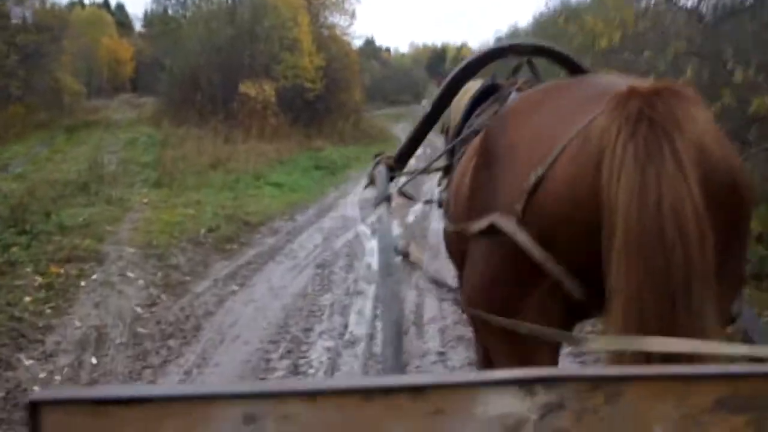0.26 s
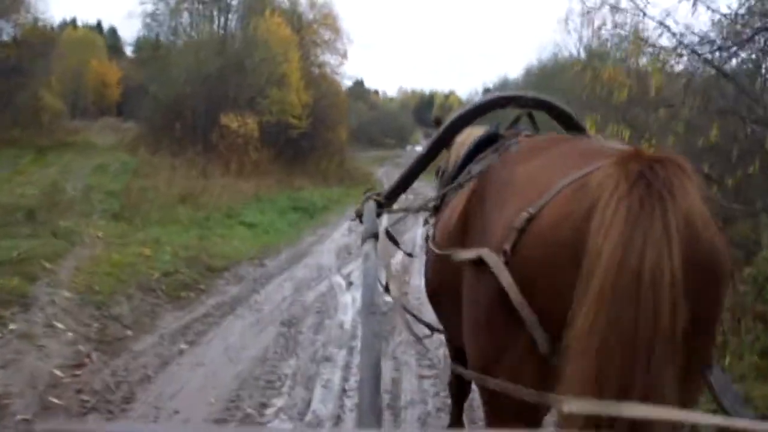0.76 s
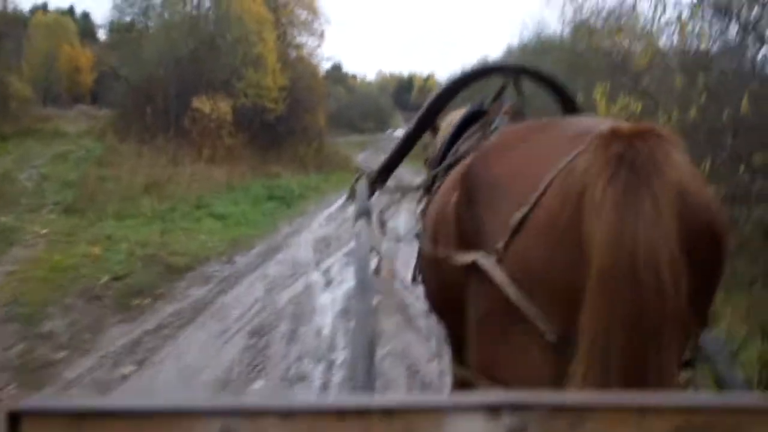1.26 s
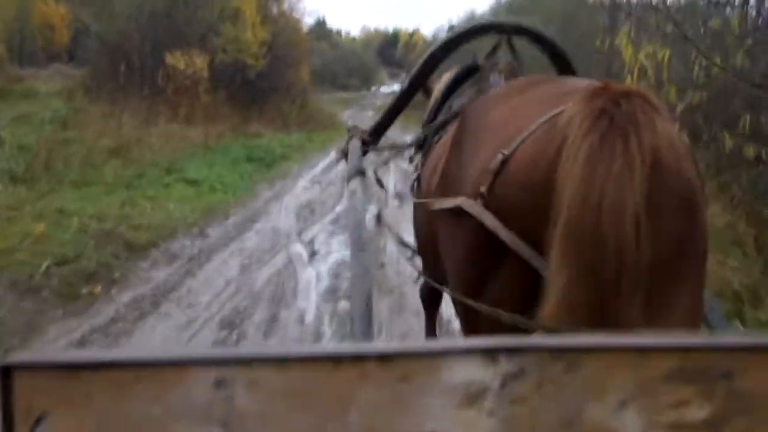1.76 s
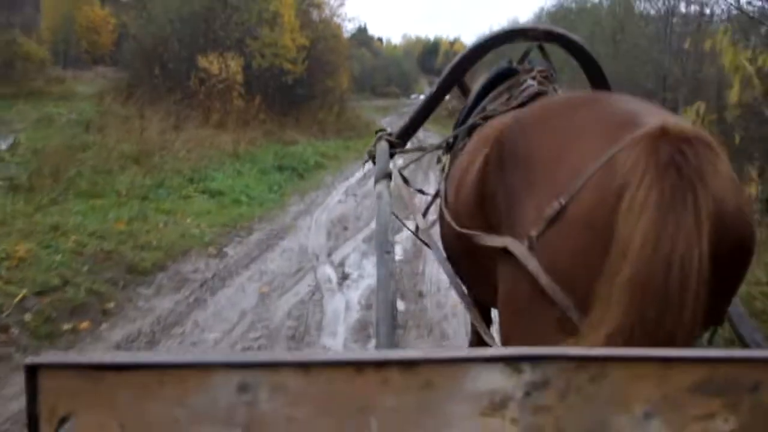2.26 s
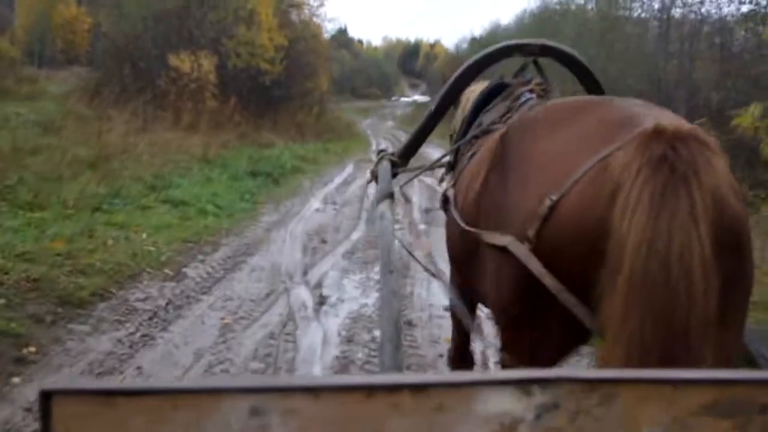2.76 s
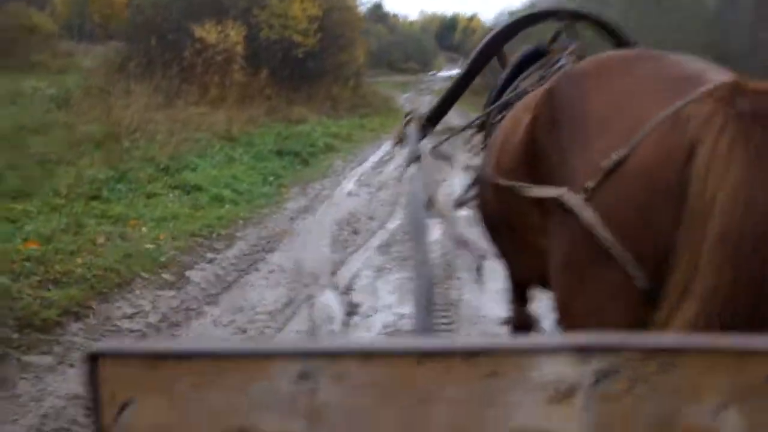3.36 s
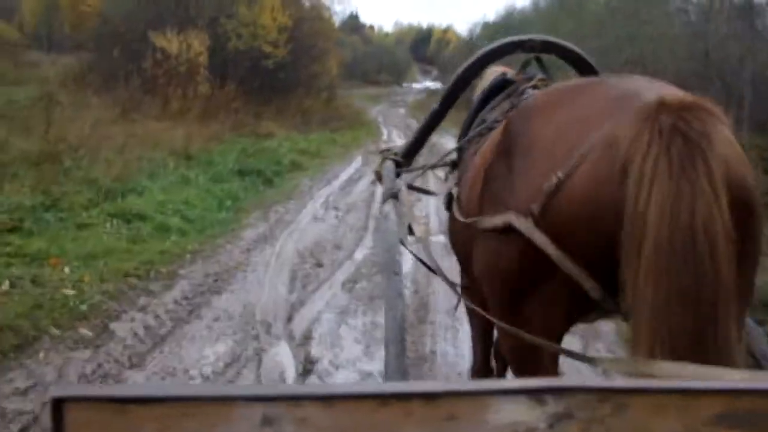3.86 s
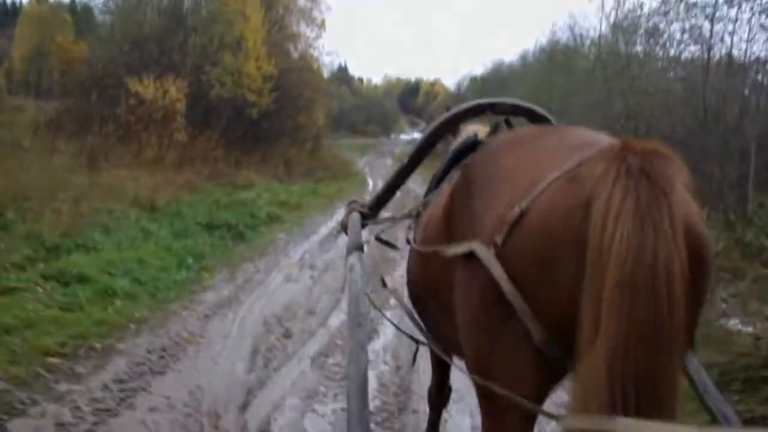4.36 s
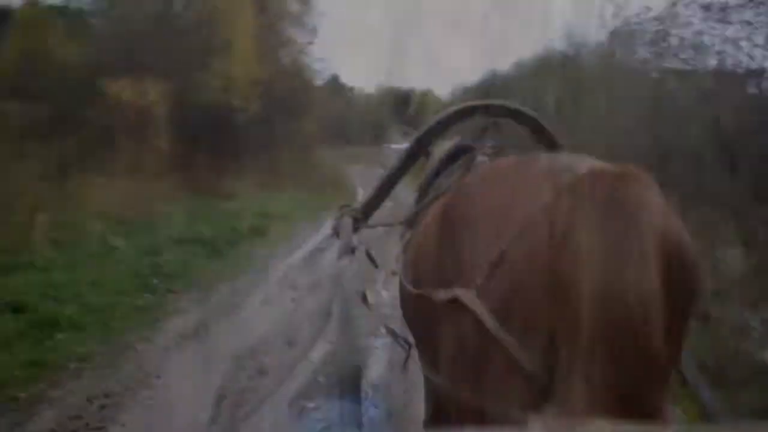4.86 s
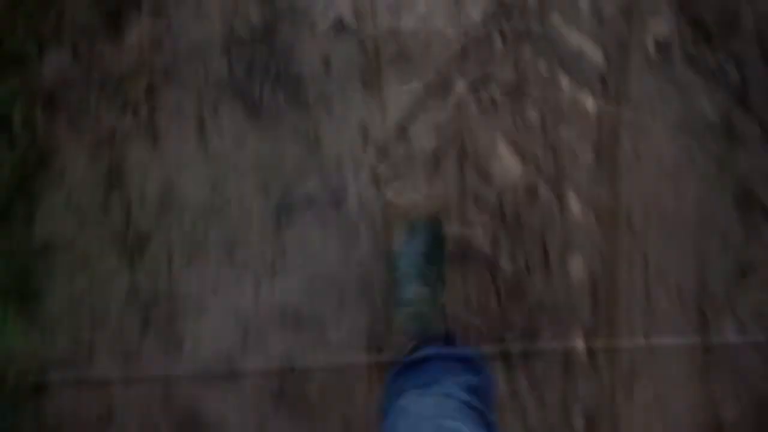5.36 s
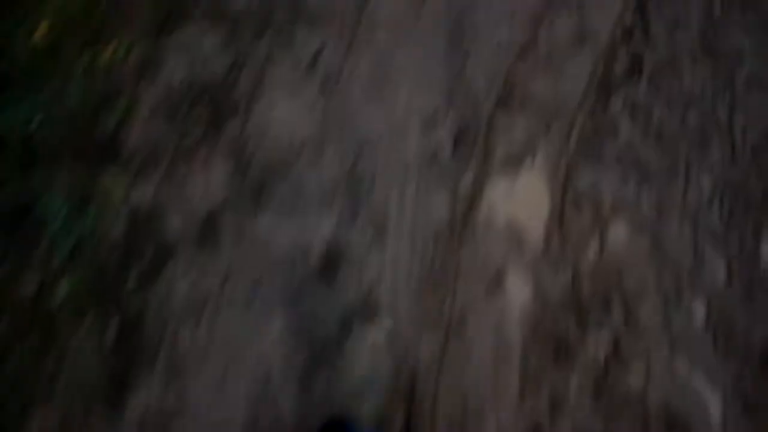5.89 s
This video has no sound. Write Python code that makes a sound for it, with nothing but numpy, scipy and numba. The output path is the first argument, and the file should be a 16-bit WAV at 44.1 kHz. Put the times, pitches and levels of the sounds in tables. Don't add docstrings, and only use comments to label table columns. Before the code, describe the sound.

Hollow plank rumble, rattling boards and spattering mud from a rolling cart fade quickly into a few gritty footsteps with soft wind.

```python
import sys
import numpy as np
from scipy import signal
from scipy.fft import rfft, irfft, next_fast_len
from scipy.io import wavfile
from scipy.ndimage import uniform_filter1d
from numba import njit

SR = 44100
rng = np.random.default_rng(int(sys.argv[2]) if len(sys.argv) > 2 else 0)


def undo_db(level):
    steps = np.asarray(level, float) / 20
    return 10 ** steps


def inscribe(sig):
    pcm = np.round(np.clip(np.atleast_2d(sig).T, -1, 1) * 32767)
    wavfile.write(sys.argv[1], SR, pcm.astype(np.int16))


N = 270288


def level(x, db):
    return x * undo_db(db) / np.sqrt(np.mean(x ** 2))


@njit
def svf(x, hz, width):
    y, band, low = np.empty(len(x)), 0., 0.
    g, k = np.tan(np.pi * hz / SR), width / hz
    for i in range(len(x)):
        v = (band + g * (x[i] - low)) / (1 + g * (g + k))
        band, low, y[i] = 2 * v - band, low + 2 * g * v, k * v
    return y


def band_noise(x, hz, width):
    return level(svf(svf(x, 1. * hz, 1. * width), 1. * hz, 1. * width), 0)


@njit
def rings(n, start, pole, size, length, rise):
    y = np.zeros(n)
    for g in range(len(start)):
        z, contact = size[g] + 0j, 1.
        for i in range(max(start[g], 0), min(start[g] + length[g], n)):
            y[i] += z.imag * (1 - contact)
            z *= pole[g]
            contact *= rise[g]
    return y


def grains(s, hz, t60, size, soft):
    hz, t60 = np.clip(hz, 30, .45 * SR), np.maximum(t60, 1e-4)
    pole = np.exp((2j * np.pi * hz - np.log(1000) / t60) / SR)
    rise = np.exp(-hz / SR / max(soft, .01))
    return rings(N, (s * SR).astype(np.int64), pole, size, (t60 * SR).astype(np.int64), rise)


def cluster(s, db, hz, t60, count, spread, burst, turns, rise=0.00095, tilt=0.83, dulls=0.):
    late, pitch, size = rng.random((len(s), count, 3)).T
    late = burst * t60 * late ** 1.5
    bend = (2 * pitch - 1) * np.abs(2 * pitch - 1)
    f = hz * np.exp(spread * bend * np.where(bend < 0, .55, 1))
    fade_db = 60 * late / t60 * (f / hz) ** dulls
    swelling = 1.03 - np.exp(-late / max(rise, 1e-4))
    sizes = undo_db(db - fade_db) * (2 * size - 1) * swelling * (f / hz) ** tilt
    ring = np.minimum(turns / f, t60)
    return grains((s + late).ravel(), f.ravel(), ring.ravel(), sizes.ravel(), soft=0.38)


def colour(x, points):
    hz, db = np.transpose(points)
    hz = np.r_[hz[0] / 8, hz, hz[-1] * 2]
    db = np.r_[db[0] - 40, db, db[-1] - 14]
    n = next_fast_len(N, True)
    log_hz = np.log(np.arange(n // 2 + 1) * SR / n + 1)
    return irfft(rfft(x, n) * undo_db(np.interp(log_hz, np.log(hz), db)), n)[:N]


def walk(rate):
    k = int(SR / rate)
    held = np.repeat(rng.standard_normal(N // 100), k)[:N]
    return 1.12 * uniform_filter1d(uniform_filter1d(held, k), k)


def curves(table):
    s, db = np.transpose(table)
    return np.interp(np.arange(N) / SR, s, db, left=-120, right=-120)


def swell(middle_s, half_s):
    return np.exp(-.5 * ((np.arange(N) / SR - middle_s) / half_s) ** 2)


def crumbs(count, scatter_db):
    at, size, sign = rng.random((count, 3)).T
    x = np.zeros(N)
    clicks = undo_db(-scatter_db * np.log(1 - .998 * size)) * np.sign(sign - .5)
    np.add.at(x, (at * N).astype(int), clicks)
    return x


def body(push, modes):
    return level(sum(undo_db(db) * band_noise(push, hz, 1.4 * width) for hz, width, db in modes), 0)


def on_foot():
    fade_over_s, fade_length_s = 5.38, 0.28
    return np.clip((np.arange(N) / SR - fade_over_s) / fade_length_s + .5, 0, 1)


# time_s, level_db
BED = [(0.0, -36.5), (1.16, -30.5), (1.6, -34), (1.69, -26.5), (1.88, -32.5), (2.01, -34), (2.3, -28.5),
       (2.46, -36), (2.88, -30), (3.29, -31.5), (3.46, -26.5), (3.62, -37.5), (3.96, -30), (4.27, -34),
       (4.71, -33), (5.36, -40.5), (5.51, -54), (6.13, -46)]
# pitch_hz, width_hz, level_db
LOW_MODES = [(97, 8.1, -7), (124.8, 23.3, 5.5), (139, 120, -8)]
# pitch_hz, width_hz, level_db
UPPER_MODES = [(194.5, 40, 5), (215, 35, 4), (251.8, 49.4, -2.5), (312, 115, -7.5), (346, 236, -10.5)]


def bed():
    low = body(crumbs(count=1500, scatter_db=-0.5), LOW_MODES) * undo_db(1.0 * walk(9.4))
    upper = body(crumbs(count=2500, scatter_db=0.5), UPPER_MODES) * undo_db(1.65 * walk(17))
    return undo_db(curves(BED) - 1.5) * (low + undo_db(1) * upper)


# start_s, peak_db, pitch_hz
BUMPS = [(0.069, -24, 186), (0.375, -16.5, 193), (0.573, -19, 137), (0.706, -14.5, 133.4),
         (1.057, -14.5, 144), (1.147, -21, 132), (1.514, -17, 123), (2.022, -12.5, 132),
         (2.125, -13.5, 132), (2.208, -23, 130), (2.261, -10.5, 133), (2.719, -12.5, 217),
         (2.779, -13, 139), (2.876, -12, 198), (3.079, -13.5, 194), (3.157, -21, 213), (3.239, -18, 108),
         (3.37, -19, 184), (3.437, -15, 149), (3.488, -13.5, 178), (4.037, -22, 125), (4.109, -18, 203),
         (4.168, -11.5, 190), (4.71, -16, 136), (4.799, -15.5, 199.5)]
# start_s, peak_db, pitch_hz
JOLTS = [(0.133, -23, 128), (0.303, -19, 133), (0.412, -19, 127), (0.478, -18.5, 129), (0.666, -18.5, 167),
         (0.883, -18.5, 177), (0.969, -15, 215), (1.259, -25, 124), (1.587, -23, 206), (1.685, -23, 126),
         (1.78, -10.5, 185), (1.848, -16, 200), (1.908, -19, 210), (1.963, -28, 215), (2.043, -14, 125),
         (2.49, -22, 148), (2.568, -20, 125), (2.664, -19, 224), (2.892, -13, 186), (2.914, -9, 213),
         (2.933, -11, 202), (2.96, -14, 215), (2.974, -18, 230), (3.305, -16, 192), (3.575, -15, 205),
         (3.812, -28, 141), (3.857, -22, 167), (3.919, -22, 186), (3.98, -24, 151), (4.058, -18, 111),
         (4.202, -19, 188), (4.367, -17, 126), (4.49, -25, 108), (4.582, -24, 175), (4.628, -24, 120),
         (4.879, -25, 173), (5.034, -18.5, 130), (5.166, -31, 127), (5.242, -29, 187), (5.704, -24, 175),
         (6.077, -23, 142)]


def ruts():
    s, db, hz = np.transpose(BUMPS + JOLTS)
    return grains(s, hz, 18 / hz, undo_db(db - 1.5), soft=0.76)


# start_s, peak_db, centre_hz
KNOCKS = [(0.312, -23, 886), (0.398, -19.5, 825), (0.427, -15, 1760), (0.528, -18, 1870),
          (1.074, -19.5, 1410), (1.433, -20.5, 1640), (1.473, -23, 770), (1.65, -24, 843),
          (2.282, -15.5, 700), (2.327, -12, 1710), (2.366, -12, 1640), (2.584, -26, 800),
          (2.836, -24.5, 930), (3.003, -20, 1106), (3.153, -22, 1030), (3.441, -20, 690), (3.48, -17, 714),
          (3.65, -24, 820), (3.666, -20.5, 1047), (4.026, -19, 900)]
# start_s, peak_db, centre_hz
BEAMS = [(1.06, -22.5, 370), (1.516, -29, 477), (2.33, -14, 560), (2.366, -16.5, 554), (2.9, -15, 553),
         (2.949, -15, 430), (3.032, -18, 542), (3.349, -21, 465), (3.537, -21, 405), (3.946, -24, 422),
         (4.489, -23, 407), (5.213, -28, 550), (5.236, -27.5, 700), (2.388, -31, 650)]
# start_s, peak_db, centre_hz
HEELS = [
    (5.577, -19, 1300),
    (5.612, -20.5, 1335),
    (5.83, -22.5, 1355),
    (6.121, -17, 1510),
]
# start_s, peak_db, centre_hz
TAPS = [(0.38, -24, 2040), (0.634, -17, 1760), (0.936, -25, 2050), (1.516, -25, 565), (1.734, -25, 1500),
        (2.245, -26, 1740), (2.405, -20, 564), (2.628, -29, 565), (2.722, -29, 1750), (3.029, -25, 600),
        (3.332, -29, 2130), (3.37, -19, 1600), (3.537, -23, 623), (3.57, -22, 794), (3.962, -25, 885),
        (4.074, -24, 1660), (4.345, -32, 560), (4.49, -21, 824), (4.556, -24, 786), (4.597, -28, 890),
        (4.634, -20, 2150), (4.856, -22, 2020), (4.874, -26, 2170), (5.505, -28, 1810), (5.816, -30, 606),
        (5.837, -32, 780)]


def knocks():
    s, db, hz = np.transpose(KNOCKS + BEAMS + HEELS)
    t60 = 0.02256 + 18 / hz
    note = grains(s + 0.00061, hz, 0.69 * t60, undo_db(db - 7.0), soft=1.0)
    crack = cluster(s - .001, db - 4, 1.3 * hz, 0.031, count=40, spread=1.25, burst=0.45,
                    turns=4.7, rise=0.002)
    modes = cluster(s - .001, db - 4, hz, t60, count=60, spread=1.266, burst=.45,
                    turns=20.4, rise=0.0032, tilt=0.84, dulls=0.4)
    s, db, hz = np.transpose(TAPS)
    taps = cluster(s - .001, db, hz, .045, count=30, spread=0.65, burst=.45,
                   turns=21.4, rise=0.0033, tilt=0.33, dulls=0.37)
    return note + crack + modes + taps


# start_s, peak_db, pitch_hz
RAPS = [(1.8335, -14.5, 930), (1.8375, -20, 910), (2.898, -12, 545), (2.902, -16, 900), (2.9107, -9.5, 540),
        (2.915, -20, 1100), (3.066, -22, 1030), (3.074, -22, 1000), (3.238, -17.5, 800), (3.245, -17, 536),
        (4.9085, -17.5, 604), (4.9703, -18.5, 1550), (4.98, -17, 1750), (4.952, -25.5, 700),
        (5.6078, -9.5, 1335), (5.7036, -25, 900), (5.709, -19, 680), (5.752, -24, 1400), (5.758, -26, 1600)]
# multiple_of_pitch, level_db
RAP_MODES = [(1, -0.5), (1.45, -7), (2.3, -11), (3.5, -17)]


def raps():
    s, db, hz = np.transpose(RAPS)
    total = np.zeros(N)
    for k, mode_db in RAP_MODES:
        mistune = 1 + 0.054 * rng.standard_normal(len(s)) * (k > 1)
        t60 = 11.3 / hz / np.sqrt(k)
        total += grains(s, k * hz * mistune, t60, undo_db(db + 2.5 + mode_db), soft=0.44)
    return total


# start_s, peak_db, centre_hz
STROKES = [(0.732, -12.5, 3720), (0.988, -20, 3300), (1.081, -17, 2400), (1.433, -18, 4600),
           (1.517, -14, 4800), (1.832, -25, 1260), (2.3284, -11, 3140), (2.365, -9, 2700),
           (2.8985, -15, 1500), (2.912, -19, 1297), (3.477, -12, 2700), (5.608, -23, 2480),
           (5.71, -25, 1500), (6.089, -12, 4800), (0.429, -22, 3000), (0.524, -20, 2920),
           (4.971, -17.5, 1900), (2.95, -23, 1900), (5.568, -21, 3500)]


def strokes():
    s, db, hz = np.transpose(STROKES)
    return cluster(s - .0003, db, hz, .022, count=40, spread=0.92, burst=.4,
                   turns=21.3, rise=0.00074, tilt=0.34)


def clatter(count):
    at, pitch, size = rng.random((count, 3)).T
    hz = 450 * 4.0 ** pitch
    taps = cluster(at * N / SR, -3.0 * np.log(1 - .98 * size), hz, 0.037, count=12,
                   spread=0.553, burst=0.44, turns=33.0)
    return level(taps, 0)


# middle_s, rattle_db, half_length_s
SHUDDERS = [
    (2.98, -38, 0.054),
    (3.498, -41, .1),
    (4.003, -39, 0.038),
]


def aftershake():
    s, db, hz = np.transpose(KNOCKS + BEAMS)
    push = np.zeros(N)
    push[(s * SR).astype(int)] = undo_db(db - 20)
    rough = sum(undo_db(db) * swell(middle, half) for middle, db, half in SHUDDERS)
    decay_s = 0.03
    return rough + signal.lfilter([1], [1, -np.exp(-1 / (decay_s * SR))], push)


# pitch_hz, width_hz, level_db
RATTLE_MODES = [(302.6, 48, 7.5), (526, 113, -0.5), (825, 250, 5), (1044, 335, 7), (1500, 800, 5.5),
                (1800, 1200, 2.5)]


def rattle(push, churn_db):
    boards = 0.87 * body(push, RATTLE_MODES) + 0.35 * clatter(count=400)
    return undo_db(2.36 * walk(24.78)) * boards * (undo_db(churn_db - 9) + aftershake())


def slops(count):
    at, pitch, size, length = rng.random((count, 4)).T
    hz = 1800 * 4.0 ** pitch
    return cluster(at * N / SR, -2.5 * np.log(1 - .98 * size), hz, .03 + .05 * length, count=30,
                   spread=0.42, burst=.6, turns=56)


# freq_hz, level_db_per_hz
MUD = [(900, -8.5), (1800, -11.5), (2800, -6.5), (4200, -4), (5400, -1.5), (6200, -4), (7200, -11.5),
       (10000, -9.5)]


def mud(count):
    at, pitch, size, turns = rng.random((count, 4)).T
    hz = 1200 * 7.0 ** pitch
    size = undo_db(-2.5 * np.log(1 - .995 * size)) * np.sqrt(hz) * pitch ** .3
    pops = grains(at * N / SR, hz, (5 + 25 * turns ** 2) / hz, size, soft=0.14)
    hiss = rng.standard_normal(N)
    wet = level(pops, -5.0) + level(slops(count=900), -6.0) + level(hiss, 0.5)
    return level(colour(wet, MUD), 0)


# freq_hz, level_db_per_hz
GRIT = [(5000, 21), (7500, 1), (9500, 2), (11200, -9), (13000, 7), (15800, 2)]


def grit(count):
    at, pitch, size = rng.random((count, 3)).T
    hz = 7000 * 2.3 ** pitch
    pops = grains(at * N / SR, hz, 25 / hz, undo_db(-2.5 * np.log(1 - .995 * size)), soft=0.71)
    return level(colour(level(pops, -2.1) + level(rng.standard_normal(N), -1.8), GRIT), 0)


# lands_s, lifts_s, crunch_db
STEPS = [
    (5.513, 5.567, -34),
    (5.599, 5.644, -33),
    (6.064, 6.14, -33),
]
LAND_DB_PER_S = [900, 900, 500]


def steps():
    t = np.arange(N) / SR
    shapes = []
    for (lands, lifts, db), rise in zip(STEPS, LAND_DB_PER_S):
        lift_db = 398 * np.maximum(t - lifts, 0)
        shapes.append(db - rise * np.maximum(lands - t, 0) - lift_db)
    return undo_db(np.max(shapes, axis=0)) + undo_db(-50) * on_foot()


# time_s, level_db
GROUND = [(0.0, -41), (0.21, -38), (0.45, -30.5), (0.8, -33), (1.06, -28), (1.36, -35), (1.56, -31),
          (2.2, -34), (2.48, -31.5), (2.7, -30), (3.28, -31), (3.56, -30), (3.77, -35.5), (3.98, -30.5),
          (4.18, -33), (4.44, -30.5), (4.84, -38.5), (5.15, -40.5), (5.36, -40), (5.5, -53)]
# middle_s, surge_db, half_length_s
PLUNGES = [
    (0.738, 4, 0.0063),
    (1.523, 13, 0.011),
    (2.334, 10, 0.051),
    (3.16, 5, 0.024),
    (4.665, 6.5, 0.011),
    (4.901, 8, 0.033),
    (5.013, 4.5, 0.047),
]
# middle_s, change_db, half_length_s
LULLS = [
    (1.877, -4.5, 0.03),
    (2.145, -3, 0.046),
    (2.465, -3, 0.019),
    (2.787, -3, 0.022),
    (3.736, -1.5, 0.022),
    (4.3, -3.5, 0.037),
    (5.17, -1.5, 0.034),
]
# freq_hz, level_db_per_hz
SCUFF = [(150, -2), (330, 2.5), (600, -1), (1000, -5), (1500, -1), (2200, -5.5), (3500, -7.5)]


def ground():
    jolt, churn_db = walk(30), curves(GROUND)
    push = crumbs(count=6000, scatter_db=5.5) + 4.1 * rng.standard_normal(N)
    wet = mud(count=16000) * undo_db(1.46 * walk(16))
    fine = grit(count=20000) * undo_db(1.4 * walk(35))
    surge_db = sum(db * swell(middle, half) for middle, db, half in PLUNGES)
    lull_db = sum(db * swell(middle, half) for middle, db, half in LULLS)
    squelch = undo_db(churn_db) * (undo_db(surge_db) * wet + undo_db(-6 + 0.3 * surge_db) * fine)
    cart = undo_db(-2.0 + lull_db + 1.42 * jolt) * (squelch + rattle(push, churn_db))
    crunch = steps()
    scuff_gain = undo_db(-42.5) * on_foot() + undo_db(-5.5) * crunch
    scuff = scuff_gain * level(colour(push, SCUFF), 0)
    boots = crunch * (wet + undo_db(-16) * fine) + scuff
    return cart + undo_db(-1.64 + 2.0 * jolt) * boots


# start_s, peak_db, centre_hz
SPLATS = [(0.2324, -36, 4640), (0.309, -18.5, 5630), (0.3346, -21, 4700), (0.3945, -17, 4400),
          (0.43, -17, 4680), (0.5224, -18.5, 3940), (0.942, -14, 3910), (1.036, -14, 4760),
          (1.2244, -21, 4730), (1.4317, -20, 5580), (1.518, -7.5, 6020), (1.6326, -18, 4500),
          (1.6841, -20, 4400), (1.993, -20.5, 5310), (2.2802, -30, 4960), (2.363, -10.5, 3850),
          (2.427, -19, 5080), (3.2061, -18, 4900), (3.263, -20, 4600), (3.359, -22, 4500),
          (3.4493, -14.5, 4340), (3.477, -14.5, 3650), (3.5368, -11.5, 4530), (3.7775, -23, 5000),
          (3.84, -19.5, 5500), (3.9439, -20, 4520), (4.3465, -23, 5650), (4.8514, -26, 5230),
          (4.8818, -19.5, 4720), (4.978, -17, 4700), (2.311, -21, 4980)]
# start_s, peak_db, centre_hz
STONES = [(0.732, -15.5, 2770), (0.8609, -20.5, 3280), (0.987, -13.5, 2390), (0.989, -13.5, 4660),
          (1.081, -12.5, 5180), (1.079, -12, 3190), (2.3283, -5.5, 2830), (2.8983, -21, 2320),
          (2.9487, -19, 2330), (3.0948, -18.5, 2340), (3.3917, -17.5, 3500), (3.411, -15, 3200),
          (4.9345, -24, 2590), (5.3714, -25.5, 3110)]
# start_s, peak_db, centre_hz
CRUNCHES = [
    (5.514, -14, 5200),
    (5.5363, -21, 4640),
    (5.5668, -16, 4700),
    (5.608, -16.5, 4560),
    (5.629, -18, 4230),
    (6.056, -29, 3320),
    (6.0703, -21, 5700),
    (6.0882, -12.5, 5050),
    (6.123, -17, 4460),
]


def splats():
    s, db, hz = np.transpose(SPLATS + STONES + CRUNCHES)
    t60 = np.full(len(s), 0.045)
    wet = cluster(s - .0015, db - 2.0, hz, t60, count=90, spread=0.672, burst=0.65,
                  turns=52.0, rise=0.0032)
    spray = cluster(s - .004, 0.99 * db - 5, 11000, 1.4 * t60, count=90, spread=0.63, burst=0.35,
                    turns=26, rise=0.01)
    struck = grains(s - 0.0004, hz, 0.84 * t60, undo_db(db - 8.5), soft=1.0)
    return struck + wet + spray


# start_s, peak_db, centre_hz
DROPS = [(0.0742, -27, 4490), (0.2514, -21, 5810), (0.4763, -14, 4140), (0.5694, -18, 4570),
         (0.5994, -22, 4810), (0.6474, -18, 5350), (0.6724, -20, 4140), (1.1288, -18, 5390),
         (1.4411, -14.5, 5300), (1.495, -13, 5910), (2.2944, -13, 5600), (2.3494, -10, 5340),
         (2.3794, -8.5, 3030), (2.8294, -16, 4400), (3.2924, -12, 5370), (3.3353, -30, 4700),
         (3.5049, -9, 5100), (3.5444, -9.5, 2900), (3.5944, -20, 5360), (4.1639, -20, 5870),
         (4.4942, -18, 5280), (4.6259, -32, 4400), (4.6648, -24, 5330), (4.8944, -28, 4630),
         (5.0244, -18, 5310), (5.0853, -30, 5530), (5.3444, -26, 5950), (5.5444, -18, 5730),
         (5.598, -17, 4440), (5.6164, -14, 5420), (5.6434, -21, 3020), (5.6594, -33, 4580),
         (5.7, -31, 3160), (5.8394, -33, 4960), (6.0774, -17, 4530)]


def drops():
    s, db, hz = np.transpose(DROPS)
    return cluster(s - .002, db - 3, hz, 0.055, count=70, spread=0.5, burst=0.6, turns=40, rise=0.004)


# start_s, peak_db
TICKS = [(0.2528, -27), (0.3935, -29), (0.5187, -26), (0.8609, -20), (1.0825, -18), (1.494, -26),
         (1.6062, -24), (2.3286, -24), (2.721, -19), (3.293, -23), (3.5428, -18), (3.6092, -20),
         (3.6646, -25), (3.7763, -24), (3.8142, -24), (4.761, -21), (4.789, -22), (4.8793, -27),
         (4.893, -19), (4.983, -17), (4.934, -21), (5.0125, -30), (5.025, -32), (5.3084, -19), (0.735, -35)]
# start_s, peak_db
SNAPS = [(5.503, -24), (5.5145, -19), (5.535, -20), (5.594, -29), (5.62, -15), (5.66, -29), (5.945, -36),
         (6.124, -19), (5.5645, -15), (5.61, -15), (5.636, -15), (5.6989, -28), (5.837, -26), (5.9878, -27),
         (6.0501, -22), (6.07, -18), (6.091, -12.5)]


def snaps():
    s, db = np.transpose(TICKS + SNAPS)
    return cluster(s - .003, db + 10.5, 12000, 0.024, count=140, spread=0.99, burst=0.42,
                   turns=16.2, rise=0.0065)


# start_s, peak_db
SPITS = [(0.184, -37), (0.3067, -34), (0.6014, -25), (0.6314, -21), (0.6844, -31), (0.6974, -23),
         (0.9652, -28), (1.3668, -27), (1.4376, -29), (1.5165, -27), (1.6574, -20), (1.7669, -32),
         (1.9324, -30), (2.2834, -27), (2.5844, -32), (2.6259, -22), (2.8164, -25), (3.0076, -25),
         (3.1234, -27), (3.5954, -29), (3.6844, -36), (3.8442, -18), (4.3474, -33), (4.6264, -34),
         (4.6654, -33), (4.8514, -33), (4.9024, -22), (4.9114, -17), (4.9836, -13), (5.012, -25),
         (5.024, -18), (5.0514, -34), (5.0944, -41), (5.1327, -37), (5.2185, -36), (5.5244, -25),
         (5.6514, -30), (5.8444, -32), (6.1044, -16)]


def spits():
    s, db = np.transpose(SPITS)
    return cluster(s - .001, db + .6, 11800, 0.013, count=60, spread=0.5, burst=0.37,
                   turns=38, rise=0.0016)


# middle_s, level_db,
# centre_hz, half_length_s
SWISHES = [(0.246, -33, 4370, 0.011), (0.477, -30.5, 5230, 0.012), (0.664, -33, 4130, 0.022),
           (1.138, -33, 4780, 0.028), (2.364, -26, 5700, .015), (2.638, -34, 5140, 0.027),
           (2.717, -26.5, 5550, 0.021), (3.022, -34.5, 7500, 0.013), (3.946, -34, 8050, 0.004),
           (4.491, -29.5, 4970, 0.011), (5.229, -44.5, 11000, 0.0063), (5.994, -42, 10500, 0.0089),
           (5.729, -42, 2880, .015), (5.994, -43.5, 3030, 0.017), (1.567, -35.5, 2650, 0.035),
           (5.722, -39, 1500, 0.016)]


def swishes():
    hiss, total = rng.standard_normal(N), np.zeros(N)
    for middle, db, hz, half in SWISHES:
        width = 0.48 * hz * (hz / 5500) ** 0.18
        total += undo_db(db) * swell(middle, half) * band_noise(hiss, hz, width)
    return total


# start_s, peak_db, pitch_hz
THUDS = [
    (3.236, -17, 110),
    (5.499, -24, 93),
    (5.739, -22, 124),
    (6.1, -14, 94.2),
    (5.762, -21, 140),
    (6.11, -15, 193),
]


def footfalls():
    s, db, hz = np.transpose(THUDS)
    return grains(s, hz, 6.3 / hz, undo_db(db + 2.5), soft=0.32)


def wind():
    cart_db, foot_db = -53, -41
    noise = rng.standard_normal(N)
    puffs = level(svf(svf(noise, 52.0, 93.0), 56.0, 117.0), 0) * undo_db(0.82 * walk(13))
    return undo_db(cart_db + (foot_db - cart_db) * on_foot()) * puffs


# freq_hz, level_db_per_hz
FOREST = [(250, 6), (500, 14), (1500, 17.5), (5000, -24), (8000, -27), (16000, -16)]


def forest():
    return level(colour(rng.standard_normal(N), FOREST), -54)


def scene():
    cart = bed() + ruts() + knocks() + raps() + strokes()
    track = ground() + splats() + drops() + snaps() + spits() + swishes() + footfalls()
    return (cart + track + wind() + forest())[None]


def roll_off(x):
    return signal.sosfilt(signal.butter(12, 15710, fs=SR, output="sos"), x)


def record(dry):
    x = signal.sosfilt(signal.butter(2, 45, "high", fs=SR, output="sos"), dry)
    x = signal.sosfilt(signal.ellip(10, .2, 80, 15740, fs=SR, output="sos"), x)
    return roll_off(x)


dry = scene()
out = record(dry)
inscribe(out)
```